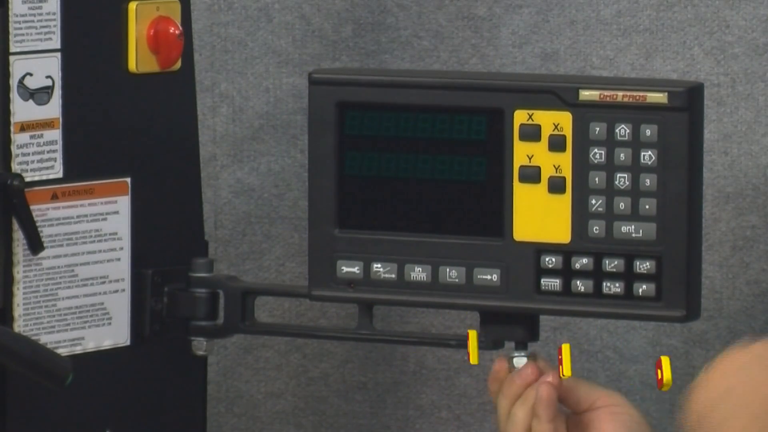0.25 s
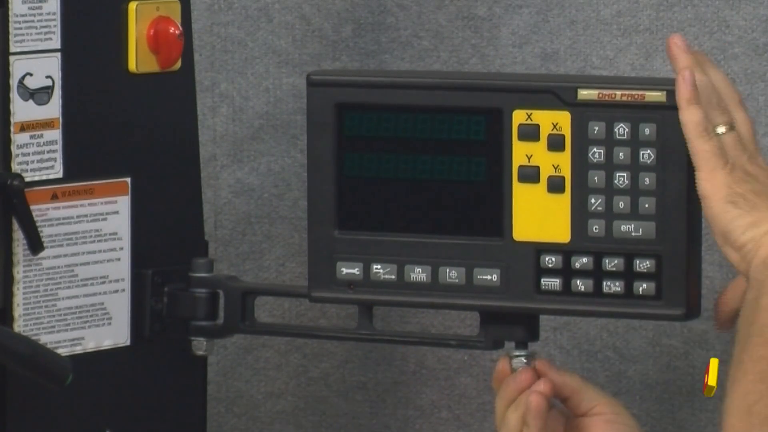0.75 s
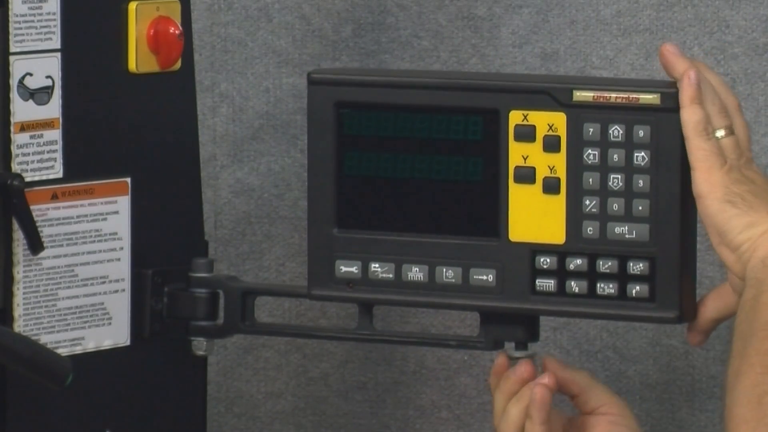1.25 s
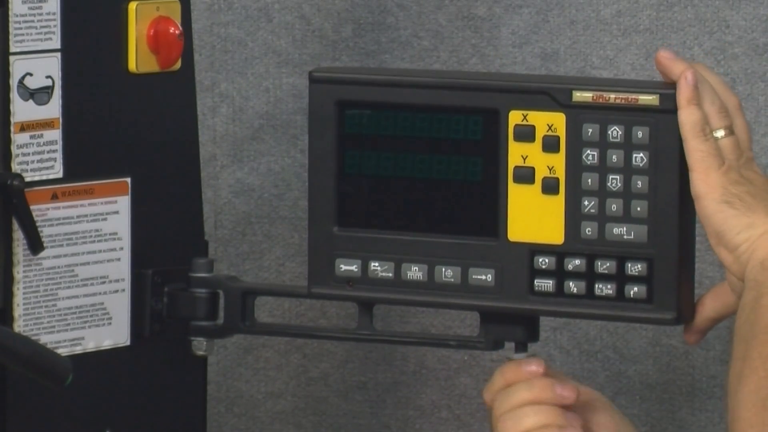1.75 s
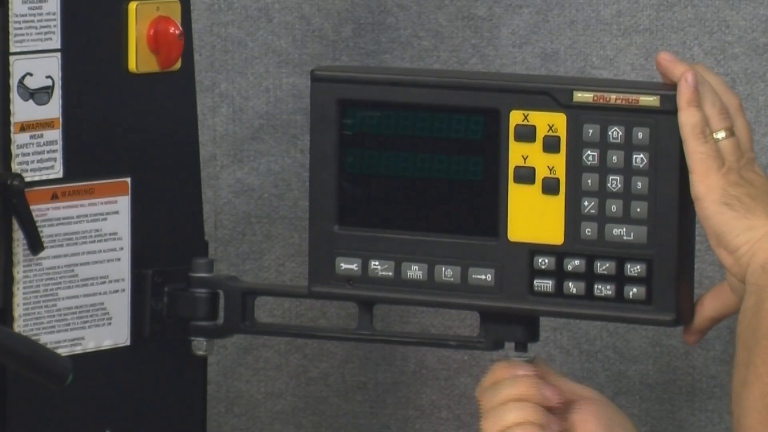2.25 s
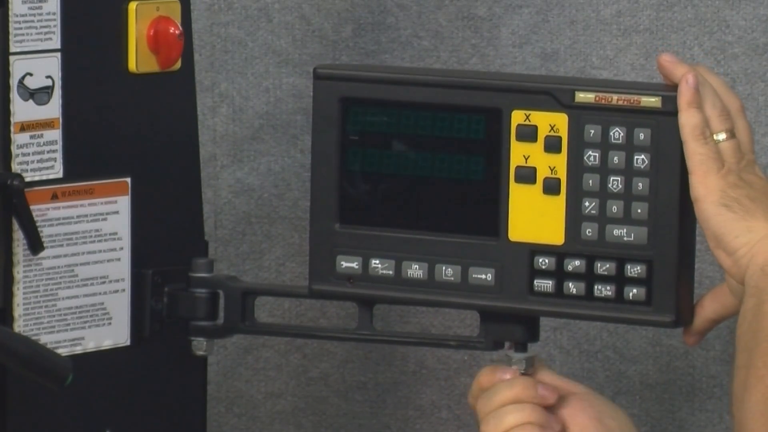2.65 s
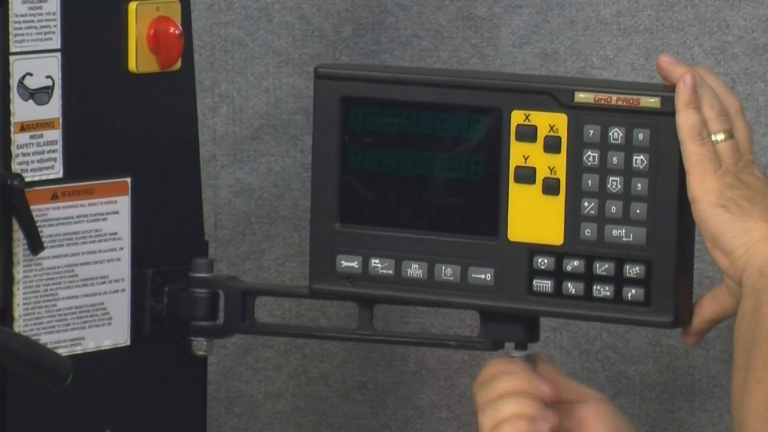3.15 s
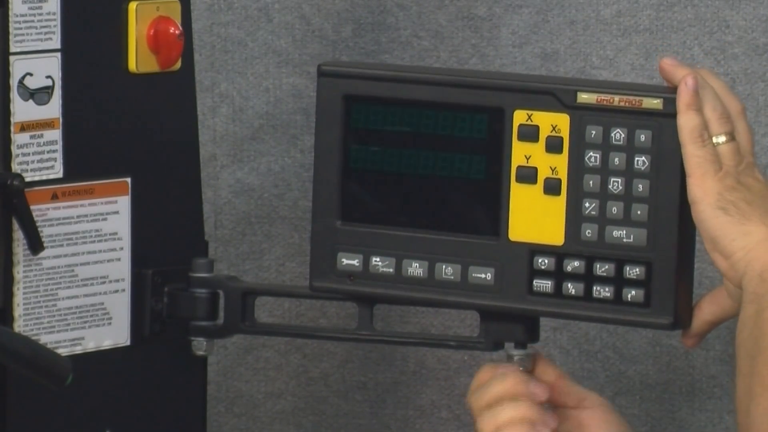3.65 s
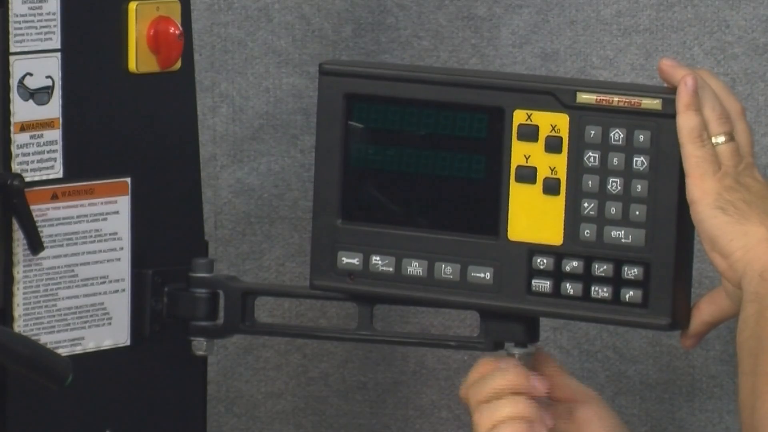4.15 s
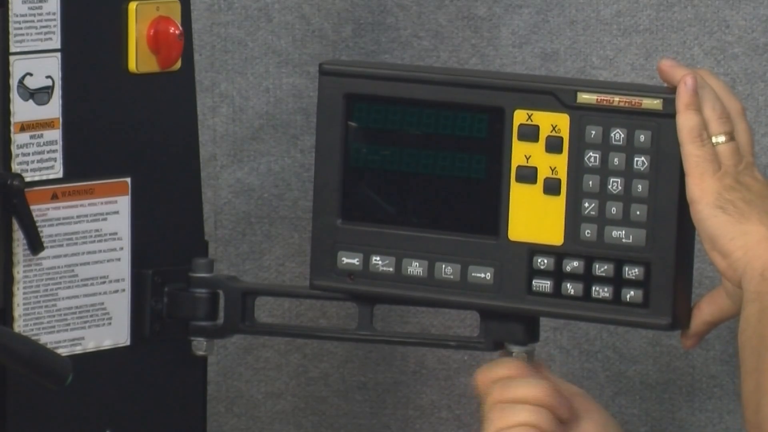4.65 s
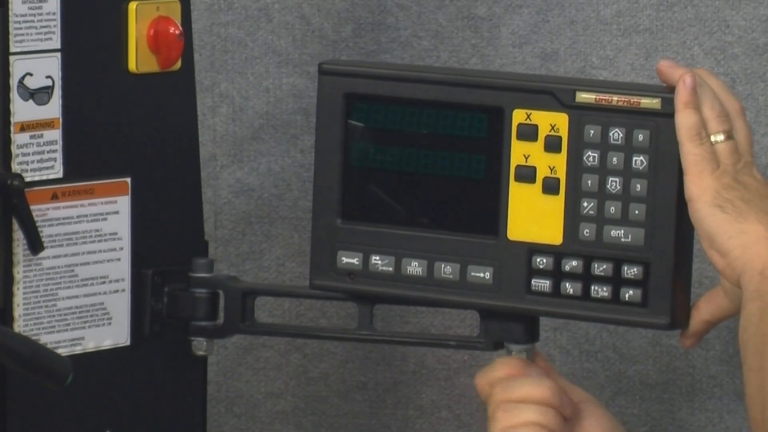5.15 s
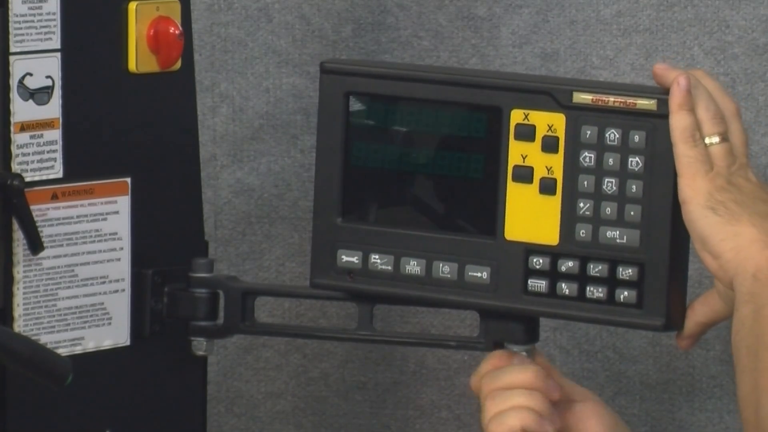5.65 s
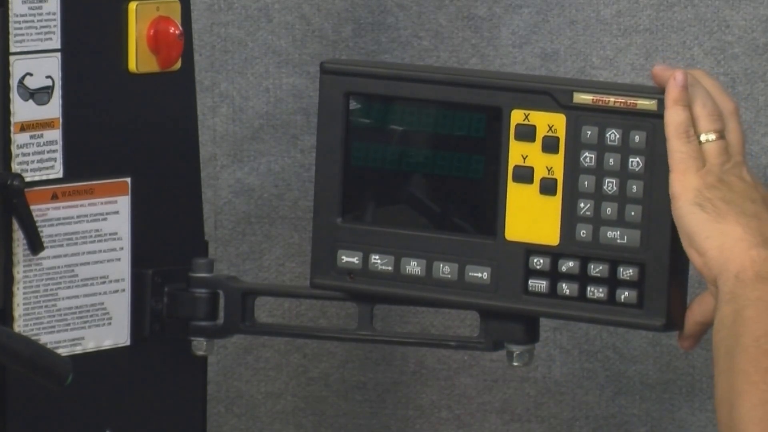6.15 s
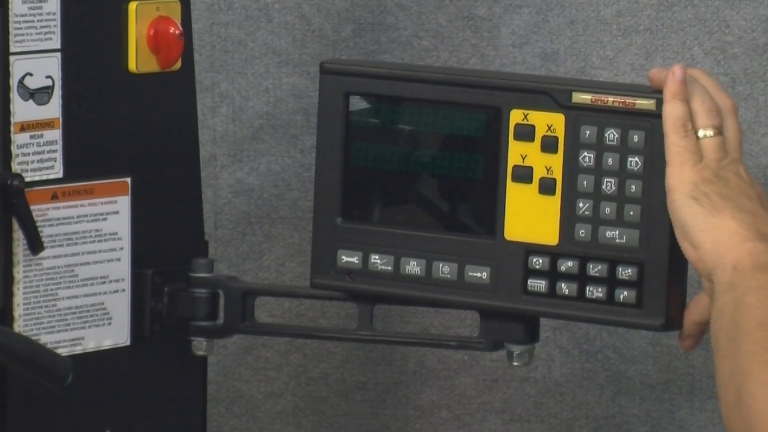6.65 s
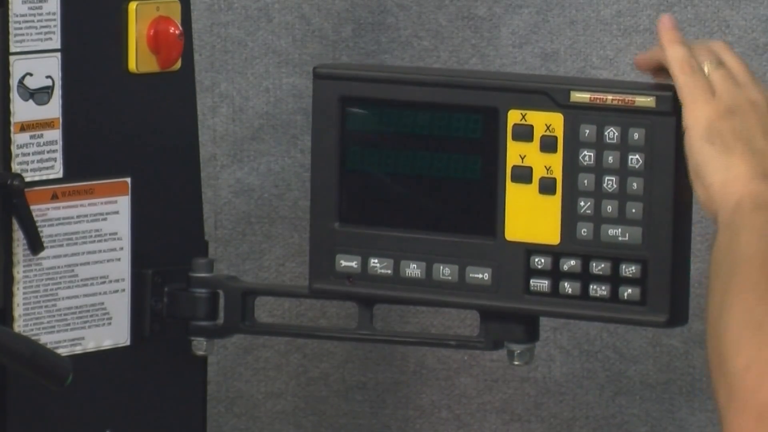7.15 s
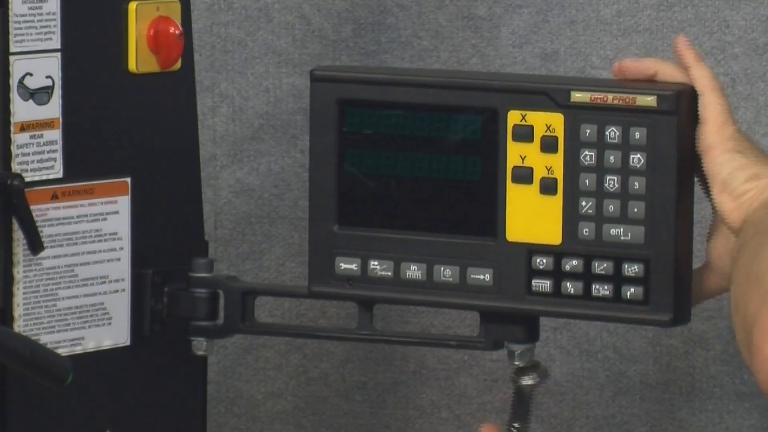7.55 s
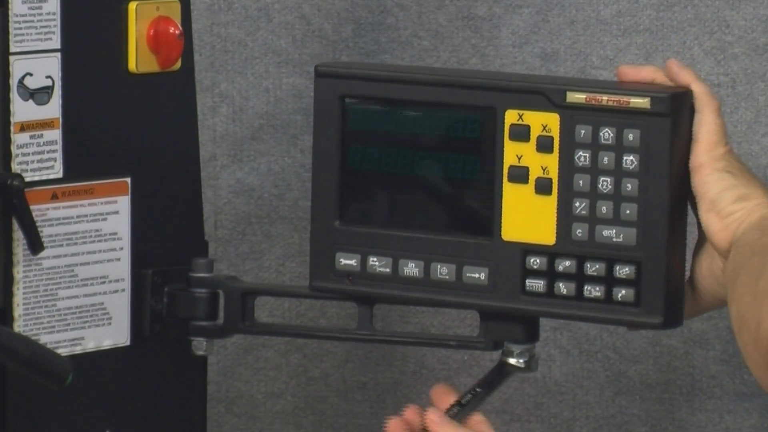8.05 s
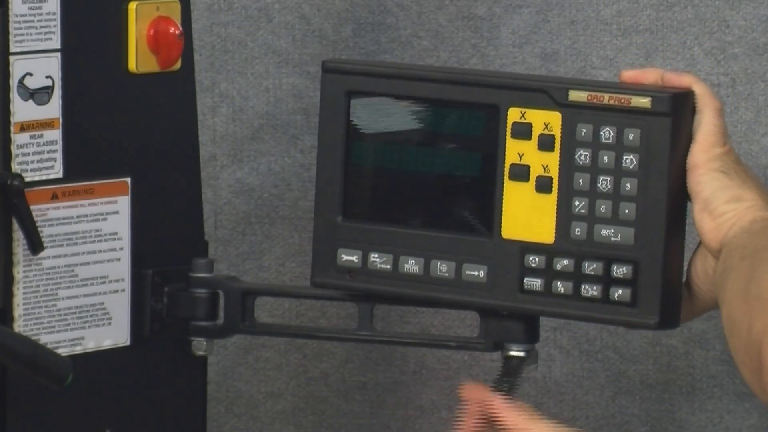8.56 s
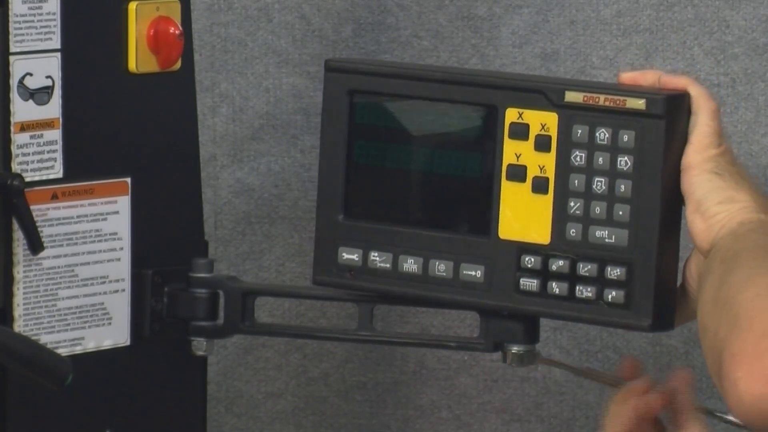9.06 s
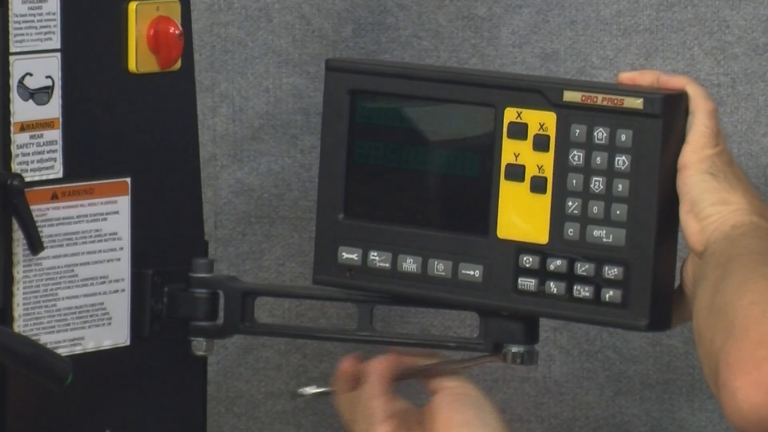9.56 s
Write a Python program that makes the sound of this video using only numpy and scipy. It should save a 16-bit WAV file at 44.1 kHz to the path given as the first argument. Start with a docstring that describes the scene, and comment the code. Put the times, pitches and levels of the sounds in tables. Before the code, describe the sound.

Near microphone, small room with a short echo and low air noise. A nut and loose washers click, chatter and grind on dry threads in short hand twists, busiest in the middle and thinning out. Then come skin rubs and dull knocks on a plastic housing, a clattering wrench contact, a sharper bright clank, and a couple of faint late bumps. Soft low thumps come through the stand.

```python
"""A hand spins a steel nut and washers up a threaded stud under a swing arm that carries a plastic box.
Noise bursts make the clicks, shaped noise the grinding and chatter; they ring the arm, box and washers.
Two gliding tones make thin squeaks. Then shaped noise rubs the box, and bursts bump it and knock a wrench
on the nut. Quiet air and a short noise tail make the small room; through the stand of the near microphone
come low thumps and a slow sway."""
import sys
import numpy as np
from scipy import signal
from scipy.fft import rfft, irfft, next_fast_len
from scipy.io import wavfile
from scipy.ndimage import uniform_filter1d

SR = 44100
rng = np.random.default_rng(int(sys.argv[2]) if len(sys.argv) > 2 else 0)


def wrap_up_sound(samples):
    """Save the sound to the file named by the first command line argument, as 16-bit audio."""
    columns = np.atleast_2d(samples).T
    # keep every value between -1 and 1, then stretch to whole-number steps
    tamed = np.clip(columns, -1, 1)
    steps = np.round(tamed * 32767).astype(np.int16)
    wavfile.write(sys.argv[1], SR, steps)


N = 432621  # length in samples


def gain_of(db):
    """Turns decibels into a plain multiplier."""
    return 10 ** (np.asarray(db) / 20)


def evened(x):
    """Scales a sound to an average (rms) strength of 1."""
    return x / np.sqrt(np.mean(x ** 2) + 1e-20)


def read(points, hz):
    """Reads a (pitch, value) table between its points, on a log pitch axis."""
    point_hz, value = np.transpose(points)
    return np.interp(np.log(hz + 1), np.log(point_hz + 1), value)


def curves(rows):
    """Gives each column at every sample, and a gate open while the table lasts."""
    point_s, *columns = np.transpose(rows)
    t = np.arange(N) / SR
    gate = np.clip(np.minimum(t - point_s[0], point_s[-1] - t) / 0.018, 0, 1)  # 18 ms fades
    return gate, *(np.interp(t, point_s, column) for column in columns)


def swells(rows, rise, fall):
    """One gain curve per level column: rows rise, hold and fall (dB per s); overlaps add in power."""
    start_s, held_s, *levels = np.transpose(rows)
    t = np.arange(0, N / SR + .01, .002)[:, None]
    before_s = np.maximum(start_s - t, 0)
    after_s = np.maximum(t - start_s - np.abs(held_s), 0)
    shape_db = -rise * before_s - fall * after_s
    gains = []
    for level_db in levels:
        coarse = np.linalg.norm(gain_of(level_db + shape_db), axis=1)
        gains.append(np.interp(np.arange(N) / SR, t[:, 0], coarse))
    return gains


def hump(hz, steep):
    """A broad spectral hump: dB falls with the square of the octaves from hz."""
    return lambda f: -steep * np.log2((f + 10) / hz) ** 2


def coloured(x, db_of):
    """Makes each pitch in x louder or softer by a rule from Hz to dB."""
    size = next_fast_len(len(x))
    boost = gain_of(db_of(np.fft.rfftfreq(size, 1 / SR)))
    return irfft(rfft(x, size) * boost, size)[:len(x)]


def add(mix, start_s, sound):
    """Mixes a sound in at a given time."""
    part = mix[round(start_s * SR):][:len(sound)]
    part += sound[:len(part)]


SPREAD_DB = 2.5  # typical random change of each mode from blow to blow


def ring(modes, start_s, level_db, steady):
    """Solid parts hum at fixed pitches (modes); blows and a steady drive set them ringing."""
    spot = rng.standard_normal((len(start_s), len(modes), 2))  # each blow lands on another spot
    level_db = np.broadcast_to(level_db, (len(modes), len(start_s)))  # one level, or one per mode
    out = np.zeros(N)
    for k, (pitch_hz, mode_db, t60_s) in enumerate(modes):
        drive = steady.copy()
        size = np.sign(spot[:, k, 0]) * gain_of(level_db[k] + SPREAD_DB * spot[:, k, 1])
        np.add.at(drive, np.round(start_s * SR).astype(int), size)
        # a two-step feedback filter rings like a struck bell; t60_s is the time to fall 60 dB
        r, w = 10 ** (-3 / (t60_s * SR)), 2 * np.pi * pitch_hz / SR
        ringing = signal.lfilter([0, np.sin(w)], [1, -2 * r * np.cos(w), r * r], drive)
        out += gain_of(mode_db) * ringing
    return out


RIPPLE_DB = 4  # height of each crack's own peaks


def blows(start_s, crack_db, bright_db, box_db, box_hz, crack_t60, bright_t60, box_t60, steep):
    """Each blow: a noisy crack, a shorter bright edge and a dull burst from the box."""
    t, out = np.arange(4096) / SR, np.zeros(N)
    noise, spots = rng.standard_normal((len(start_s), 3, 4096)), rng.random((len(start_s), 2))
    for k, (mid, high, low) in enumerate(noise):
        # every contact spot has its own row of peaks, 1 to 3 kHz apart
        spacing_hz, shift = 1000 + 2000 * spots[k, 0], spots[k, 1]
        peaks = lambda f: RIPPLE_DB * np.sin(2 * np.pi * (f / spacing_hz + shift))
        mid = evened(coloured(coloured(mid, peaks), hump(3370, 7.4)))
        high = evened(coloured(coloured(high, peaks), hump(10500, 18)))
        low = evened(coloured(low, hump(box_hz[k], steep)))
        crack = gain_of(crack_db[k] - 12.5 - 60 * t / crack_t60) * mid
        edge = gain_of(bright_db[k] - 1.5 - 60 * t / bright_t60) * high
        dull = gain_of(box_db[k] + 2.0 - 60 * t / box_t60) * low
        # crack and edge fade in over 2.5 ms, the box over 3.6 ms
        burst = np.minimum(t / 0.0025, 1) * (crack + edge) + np.minimum(t / 0.0036, 1) * dull
        add(out, start_s[k] - .001, burst)
    return out


# How strongly each pitch sounds in the room air: pitch_hz, relative level_db (per Hz)
AIR_COLOUR = [(12, -8), (20, 2), (150, -3), (187, -2.5), (270, -6), (301, 0.5), (357, -9.5), (485, -9.5),
              (642, -11.5), (698, -14), (976, -18.5), (1660, -19.5), (16000, -31)]
AIR_DB = -56  # overall air level
# Slow sway felt through the stand: start_s, level_db
STAND_SWAY = [(0, -59), (0.6, -56.5), (1.2, -64), (2.3, -50.5), (2.75, -67), (3.05, -56.5), (4.1, -52),
              (4.7, -56.5), (4.95, -48), (5.15, -64), (5.33, -44), (5.5, -66), (6, -60.5), (8.5, -65),
              (9.8, -86)]


def background():
    """Steady room air is shaped noise; the stand's low sway is noise around 45 Hz."""
    air_noise, sway_noise = rng.standard_normal((2, N))
    air = gain_of(AIR_DB) * evened(coloured(air_noise, lambda f: read(AIR_COLOUR, f)))
    _, sway_db = curves(STAND_SWAY)
    sway = gain_of(sway_db) * evened(coloured(sway_noise, hump(45, 4.5)))
    return air + sway


# How fast the room's echo dies: pitch_hz, t60_s (seconds to fall 60 dB)
ROOM_DECAY = [(200, 0.84), (800, 0.32), (2500, 0.22), (6000, 0.34), (12000, 0.082)]


def room(x):
    """Many small echoes act like a noise tail after the first wall; each band dies at its own speed."""
    taps = rng.standard_normal(SR) * (np.arange(SR) > 350)  # starts about 8 ms late
    hz, t, bands = signal.stft(taps, SR, nperseg=256)
    decay = gain_of(-60 * t / read(ROOM_DECAY, hz)[:, None])
    tail = signal.istft(bands * decay, SR, nperseg=256)[1]
    return signal.oaconvolve(x, tail / np.linalg.norm(tail))[:N]


# Jolts felt through the stand: start_s, relative level_db
STAND_JOLTS = [(0.428, -41), (0.738, -48.5), (1.166, -50), (1.612, -50), (2.32, -45.5), (2.844, -38.5),
               (2.936, -44), (3.043, -48), (3.147, -47), (3.426, -51), (4.263, -43), (4.542, -50),
               (5.092, -44), (7.682, -45), (8.257, -46)]


def thumps():
    """The stand dips, then swings back: a 52 Hz wave that dies within a few hundredths of a second."""
    t, out = np.arange(4096) / SR, np.zeros(N)
    swing = -np.sin(2 * np.pi * 52 * t) * np.exp(-t / 0.0043)
    for start_s, level_db in STAND_JOLTS:
        add(out, start_s, gain_of(level_db + 19.5) * swing)
    return out


# Hand and sleeve strokes: start_s (full pressure), held_s, hiss_level_db, scuff_level_db
HAND_STROKES = [(0.0, 0.1, -65, -59), (5.76, 0.054, -50, -58), (6.1, .25, -66, -65.5),
                (6.53, 0.039, -62, -35.5), (6.64, 0.0074, -58, -36.5), (6.9, .15, -60, -63),
                (7.17, 0.075, -56.5, -61.5), (7.45, 0.014, -57, -55.5), (7.77, 0.025, -58, -40.5),
                (7.9, 0.064, -65, -49.5), (8.1, 0.043, -65.5, -77), (8.3, 0.012, -58, -47),
                (8.5, 0.013, -75, -57), (8.7, .4, -70, -72), (9.2, 0.19, -68, -66)]
STROKE_RISE, STROKE_FALL = 207, 109  # dB per s, pressing on and easing off


def rubbing():
    """Skin and cloth slide over the box: a hiss and a dull, lumpy scuff, both shaped noise."""
    hiss_gain, scuff_gain = swells(HAND_STROKES, STROKE_RISE, STROKE_FALL)
    hiss_noise, scuff_noise, lumps = rng.standard_normal((3, N))
    lumps = gain_of(3.7 * evened(uniform_filter1d(lumps, 300)))
    hiss = evened(coloured(hiss_noise, hump(3670, 1.5)))
    scuff = evened(lumps * coloured(scuff_noise, hump(850, 4.5)))
    return hiss_gain * hiss + scuff_gain * scuff


# Ringing pitches of the plastic box: pitch_hz, relative level_db, t60_s (seconds to fall 60 dB)
BOX_MODES = [(226, -8, .2), (276, -5, .2), (410, -2, .1), (590, 0, .09), (735, -1, .09), (945, -2, .08),
             (1165, -2, .08), (1325, -2, .08), (1700, -7, .08), (2100, -10, .08)]
# Hands and tool bumping the box, levels relative:
# start_s, crack_level_db, bright_level_db, box_level_db, dull_pitch_hz (centre of the dull burst)
BOX_BUMPS = [(6.0644, -33, -33, -65, 188), (6.1552, -45, -39, -62, 151), (6.195, -53, -65, -42.5, 153),
             (6.4222, -32, -40, -42.5, 940), (6.562, -45, -60, -26.5, 567),
             (6.6298, -28.5, -54, -28.5, 990), (6.885, -41, -33, -51, 306), (7.1139, -37, -59, -41.5, 482),
             (7.2807, -48, -60, -48.5, 1310), (7.3011, -44, -60, -37, 510), (7.328, -39, -62, -46, 550),
             (7.9771, -35.5, -50, -35.5, 924), (8.2386, -39, -46, -35, 820), (8.249, -27, -38, -30.5, 1090),
             (8.4733, -38.5, -61.5, -35.5, 300), (9.104, -58, -58, -48, 684)]


def bumps():
    """Soft bumps: short and dull; each mostly rings the box modes near its own centre pitch."""
    start_s, crack_db, bright_db, box_db, dull_hz = np.transpose(BOX_BUMPS)
    near_db = hump(dull_hz, 9.0)(np.array(BOX_MODES)[:, :1])
    rings = ring(BOX_MODES, start_s, box_db - 8.5 + near_db, np.zeros(N))
    return blows(start_s, crack_db, bright_db, box_db, dull_hz, 0.057, 0.0089, 0.055, 7.7) + rings


# Ringing pitches of the wrench, then the arm: pitch_hz, relative level_db, t60_s (seconds to fall 60 dB)
WRENCH_MODES = [(4675, -14, .3), (6078, -19, .25), (6330, -14, .25), (9085, -2, .26), (9190, -4, .2),
                (10950, -5, .08), (11300, -7, .08), (12290, 0, .16), (13797, -2, .13), (15080, -5, .13),
                (15610, -1, .11)]
ARM_MODES = [(2480, -8, .1), (3450, -3, .07), (3658, -9, .9), (3800, -5, .07), (4370, -8, .07),
             (4630, -10, .16), (4690, -9, .2), (9787, -10, .15), (11400, -9, .05)]
# Wrench knocks, levels relative: start_s, crack_level_db, bright_level_db, box_level_db,
# dull_pitch_hz (centre of the dull burst), wrench_ring_level_db
WRENCH_KNOCKS = [(6.4943, -50, -50, -28.5, 1330, -46), (7.3932, -25, -34.5, -44, 275, -54),
                 (7.6809, -10, -19, -32, 431, -32), (7.6949, -13.5, -25, -29.5, 525, -43),
                 (7.7264, -29.5, -24, -28, 1370, -42), (7.7608, -15.5, -20, -29, 972, -42),
                 (8.2562, -13.5, -10.5, -32, 1390, -20.5), (8.2635, -37, -34, -30.5, 280, -36)]
GRIP = .5  # how strongly a ring flutters when held in the hand


def wrench():
    """Knocks ring the wrench, the arm and the box; the wrench and arm rings flutter."""
    start_s, crack_db, bright_db, box_db, dull_hz, wrench_db = np.transpose(WRENCH_KNOCKS)
    still = np.zeros(N)
    flutter = 1 + GRIP * evened(uniform_filter1d(rng.standard_normal(N), size=120))
    metal = ring(WRENCH_MODES, start_s, wrench_db - 9.0, still)
    metal += ring(ARM_MODES, start_s, crack_db - 27.5, still)
    box = ring(BOX_MODES, start_s, box_db - 3.5, still)
    knocks = blows(start_s, crack_db, bright_db, box_db, dull_hz, 0.053, 0.023, 0.096, 4.3)
    return knocks + flutter * metal + box


# Dry thread squeaks, one list each: start_s, pitch_hz, level_db
THREAD_SQUEAKS = [
    [(3.84, 12538, -67), (3.864, 12677, -62), (3.9, 12400, -64), (3.96, 11278, -69)],
    [(4.08, 11774, -62), (4.134, 11900, -67), (4.15, 12098, -88)],
]


def squeaks():
    """The dry thread squeaks: thin gliding tones with a slightly unsteady level."""
    out = np.zeros(N)
    for rows in THREAD_SQUEAKS:
        gate, pitch_hz, level_db = curves(rows)
        waver = 1 + .3 * evened(uniform_filter1d(rng.standard_normal(N), 250))
        tone = np.sqrt(2) * np.sin(2 * np.pi * np.cumsum(pitch_hz) / SR)
        out += gate * gain_of(level_db) * waver * tone
    return out


# Twists of the nut: start_s (full speed), held_s, grind_level_db, chatter_level_db
NUT_TWISTS = [(0.0, 0.11, -65.5, -71), (0.47, 0.018, -49.5, -53), (0.6, 0.12, -57, -61.5),
              (0.82, 0.0075, -50, -67), (1.2, 0.0071, -46.5, -58), (1.48, 0.0038, -43.5, -59.5),
              (1.65, 0.032, -45.5, -61), (1.97, 0.11, -44, -58.5), (2.31, .07, -45, -54),
              (2.9, .015, -44, -50.5), (3.05, 0.028, -52.5, -73), (3.22, 0.011, -42, -53.5),
              (3.49, 0.0072, -39.5, -48.5), (3.78, 0.0097, -46, -54), (4.03, 0.011, -43.5, -53),
              (4.32, 0.0085, -43, -53.5), (4.6, 0.029, -41.5, -51.5), (4.88, 0.024, -44, -50),
              (5.1, 0.067, -52.5, -51), (5.33, 0.11, -63, -68)]
TWIST_RISE, TWIST_FALL = 225, 132  # dB per s, speeding up and coasting down
# How strongly each pitch sounds in the grinding: pitch_hz, relative level_db (per Hz)
GRIND_COLOUR = [(200, -11), (500, 2), (1200, 4), (2200, -4), (3700, -4), (5000, -2.5), (7000, -51),
                (14000, -32)]


def turning():
    """The turning nut grinds grittily in the thread, with bright chatter ticks of uneven size."""
    grind_gain, chatter_gain = swells(NUT_TWISTS, TWIST_RISE, TWIST_FALL)
    grind_noise, chatter_noise, lumps = rng.standard_normal((3, N))
    lumps = gain_of(4.2 * evened(uniform_filter1d(lumps, 180)))
    grind = evened(lumps * coloured(grind_noise, lambda f: read(GRIND_COLOUR, f)))
    tick_sizes = gain_of(7.5 * np.minimum(rng.exponential(1, N), 3))
    ticks = tick_sizes * (rng.random(N) < 110 / SR)  # about 110 a second, at random times
    decay = signal.lfilter([1], [1, -np.exp(-1 / (0.0012 * SR))], ticks)
    chatter = evened((1.3 + evened(decay)) * coloured(chatter_noise, hump(9500, 12)))
    return grind_gain * grind, chatter_gain * chatter


# Nut striking the stud, levels relative: start_s, crack_level_db, bright_level_db, box_level_db
NUT_CLICKS = [(0.23, -41.5, -58, -52), (0.4285, -18, -23, -42), (0.502, -34, -55, -45.5),
              (0.7383, -19.5, -43, -40.5), (1.1577, -24.5, -46, -36.5), (1.1804, -26.5, -27, -54),
              (1.2687, -31, -44, -46), (1.3144, -28.5, -48, -46), (1.335, -33, -40, -48),
              (1.6127, -21, -39, -36.5), (1.7575, -20.5, -41, -42), (1.931, -25.5, -32, -41),
              (1.9899, -23, -38, -35), (2.01, -34, -36, -47), (2.0263, -26, -30, -54),
              (2.0463, -24, -36, -44), (2.0765, -24.5, -37, -41), (2.2436, -22, -54, -37.5),
              (2.3211, -13, -18, -34.5), (2.359, -15.5, -21.5, -36), (2.8439, -12, -14, -32),
              (2.9358, -18, -22, -63), (2.9645, -20.5, -46, -58), (3.045, -21, -43, -39.5),
              (3.1492, -17, -22.5, -37), (3.215, -23, -34, -47), (3.2498, -25.5, -33, -53),
              (3.3497, -19.5, -39, -41.5), (3.366, -36, -39, -50), (3.4253, -20, -34, -38.5),
              (3.4845, -18.5, -32, -45), (3.5054, -19, -30, -52), (3.5214, -22, -34, -51),
              (3.5419, -34, -24.5, -56), (3.5715, -24, -32, -68), (3.6141, -23, -39, -41.5),
              (3.714, -20.5, -28.5, -42.5), (3.7549, -22, -43, -39), (3.7848, -36, -36, -40.5),
              (3.8063, -25.5, -38, -70), (3.828, -32, -38, -55), (3.8811, -22.5, -37.5, -40),
              (3.9786, -18, -28, -38.5), (4.0246, -19.5, -34, -38.5), (4.1632, -33, -49, -41),
              (4.263, -15, -22.5, -41), (4.3087, -15.5, -43, -40), (4.34, -27, -34, -50),
              (4.4411, -19, -32, -37), (4.5411, -20.5, -27, -35.5), (4.6129, -19, -28, -52),
              (4.7317, -18, -18, -39.5), (4.8204, -22, -36, -35), (4.8835, -22, -57, -56),
              (5.0945, -21, -18.5, -39), (5.1547, -32, -33, -59), (5.253, -31, -41, -52)]
# Washers pinging: start_s, relative level_db
WASHER_PINGS = [(0.4284, -47), (1.1672, -21), (1.6227, -25.5), (1.7734, -44), (1.9904, -38), (2.0324, -24),
                (2.2398, -29), (2.2548, -26), (2.3186, -19), (2.4164, -30), (2.844, -39), (2.9347, -24),
                (3.047, -34), (3.2495, -37), (3.3647, -31), (3.5054, -29), (3.5423, -35), (3.5748, -26),
                (3.7135, -44), (3.7638, -33), (3.8082, -38), (4.0228, -33), (4.1632, -50), (4.2627, -32),
                (4.34, -35), (4.4408, -39), (5.0943, -35)]
# Ringing pitches of the washers: pitch_hz, relative level_db, t60_s (seconds to fall 60 dB)
WASHER_MODES = [(15075, 0, .14), (15245, -1, .12)]
LOOSE = .6  # how strongly the washers flutter as they touch while ringing


def nut():
    """Clicks and grinding ring the arm and the box; pings and chatter ring the washers."""
    start_s, crack_db, bright_db, box_db = np.transpose(NUT_CLICKS)
    grind, chatter = turning()
    dull_hz = np.full(len(start_s), 800.)
    clicks = blows(start_s, crack_db, bright_db, box_db, dull_hz, 0.06, 0.031, 0.083, 3.6)
    arm = ring(ARM_MODES, start_s, crack_db - 27.0, 0.0043 * grind)
    box = ring(BOX_MODES, start_s, box_db - 19, 0.0036 * grind)
    ping_s, ping_db = np.transpose(WASHER_PINGS)
    rattle = 1 + LOOSE * evened(uniform_filter1d(rng.standard_normal(N), size=150))
    washers = rattle * ring(WASHER_MODES, ping_s, ping_db - 12.0, 0.0068 * chatter)
    return clicks + grind + chatter + arm + box + washers


def scene():
    """All sources in the room; thumps reach the microphone through the stand."""
    near = nut() + squeaks() + rubbing()
    tool = wrench() + bumps()
    echo = room(gain_of(-9.0) * near + gain_of(-10.5) * tool)
    return (near + tool + echo + thumps() + background())[None]


ROLL_HZ, EDGE_HZ = 15850, 17100  # where the treble drops, and the band limit


def record(dry):
    """The top treble drops away sharply, by 33 dB; then comes the band limit."""
    roll = signal.firwin(401, ROLL_HZ, window=("kaiser", 7), fs=SR)[None]
    limit = signal.firwin(511, EDGE_HZ, window=("kaiser", 10), fs=SR)[None]
    rolled = signal.oaconvolve(dry, roll, "same")
    soft = rolled + gain_of(-33) * (dry - rolled)
    return signal.oaconvolve(soft, limit, "same")


dry = scene()
out = record(dry)
wrap_up_sound(out)
```